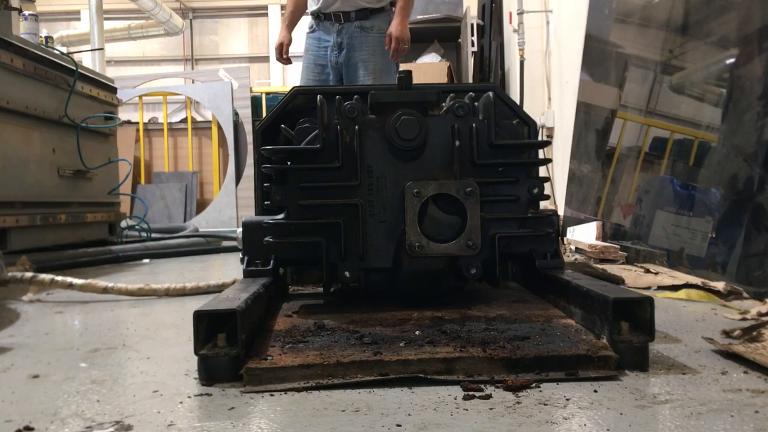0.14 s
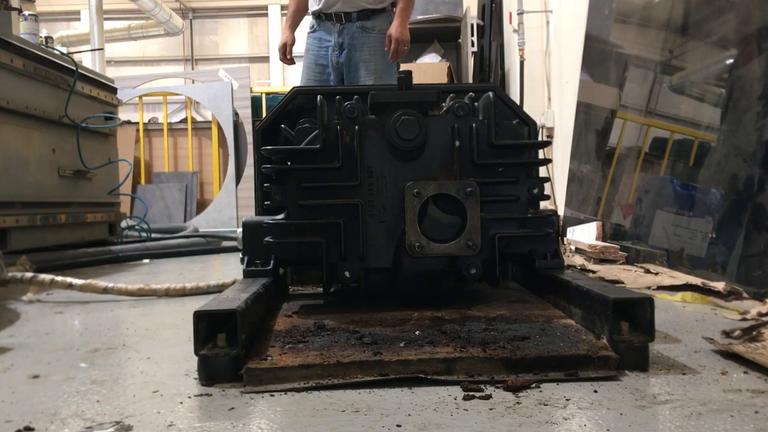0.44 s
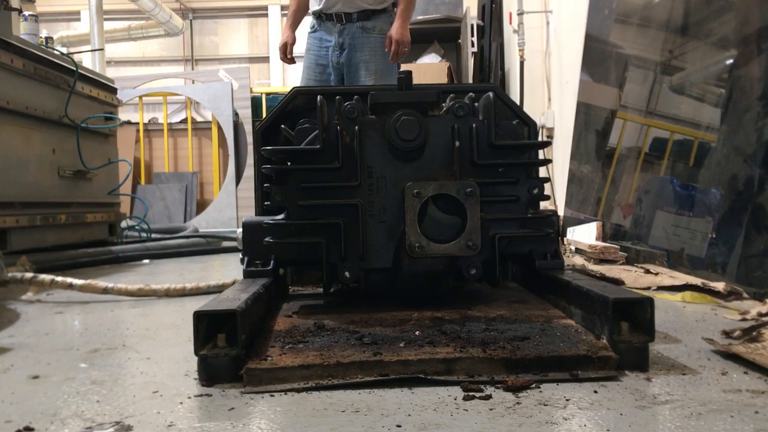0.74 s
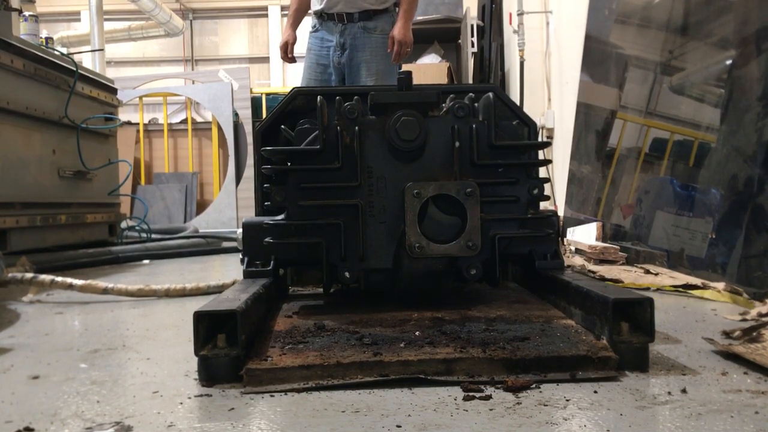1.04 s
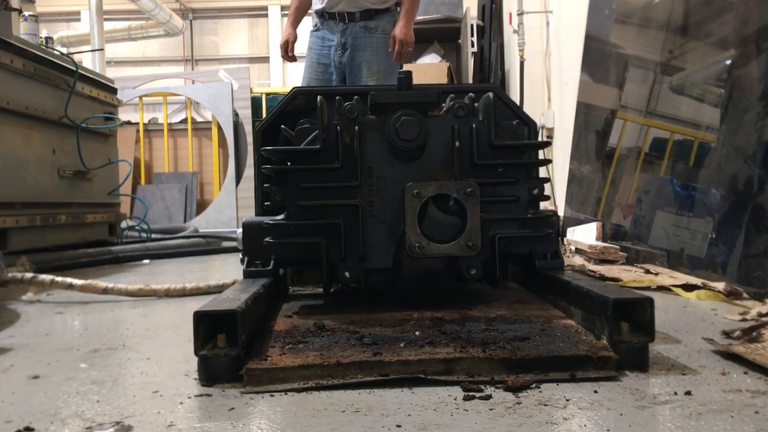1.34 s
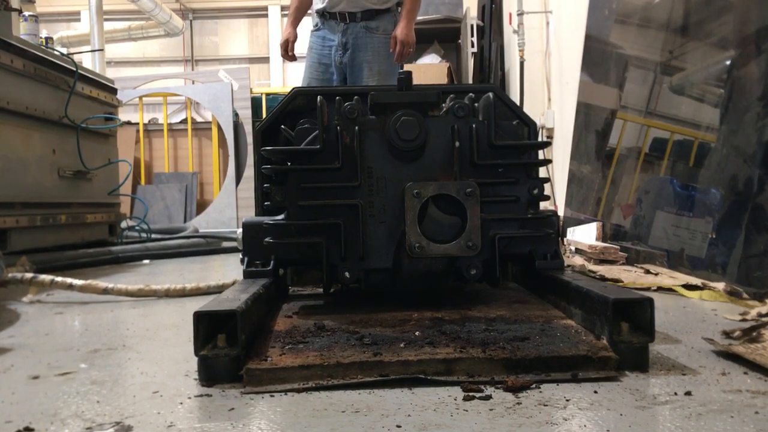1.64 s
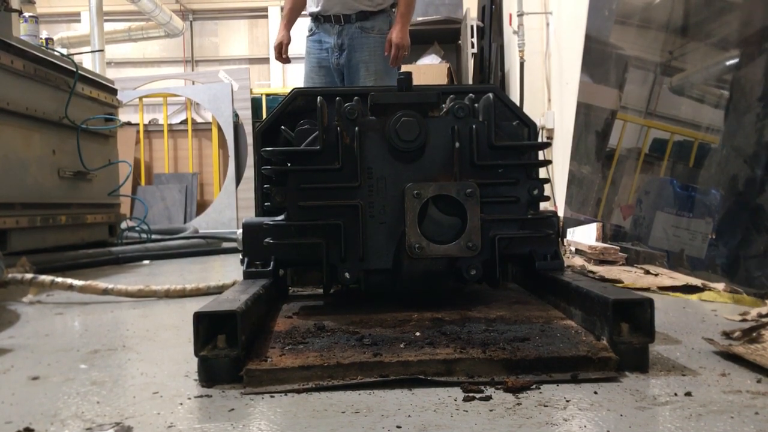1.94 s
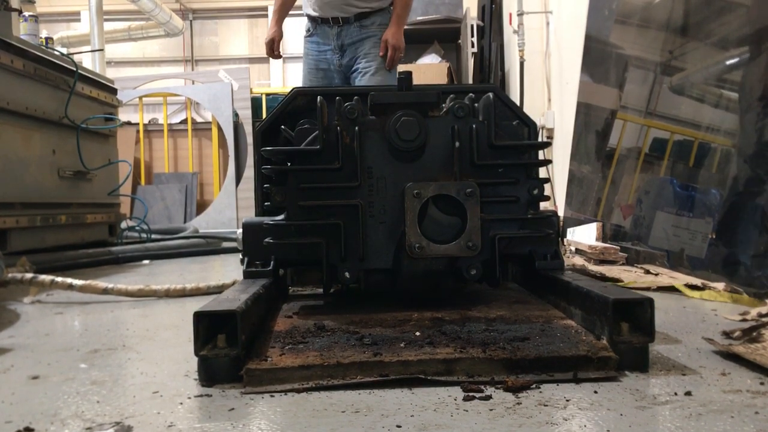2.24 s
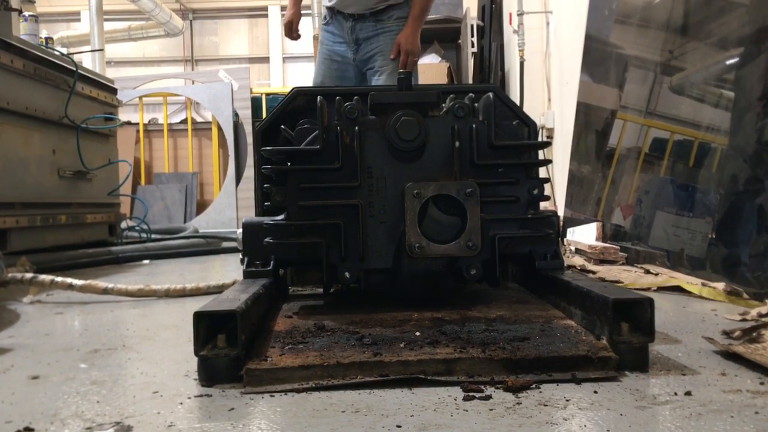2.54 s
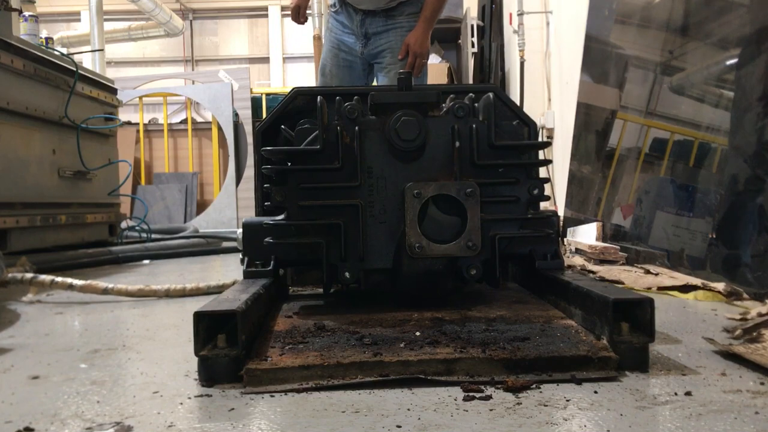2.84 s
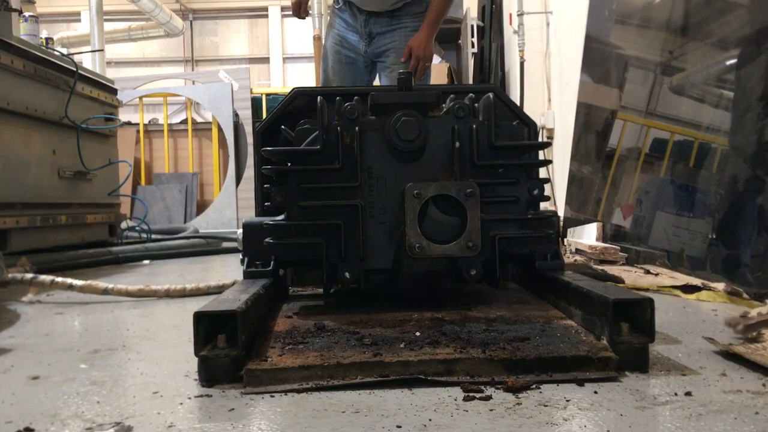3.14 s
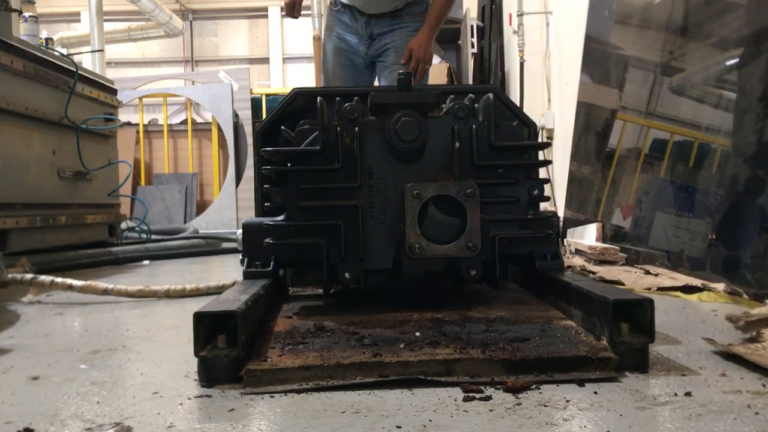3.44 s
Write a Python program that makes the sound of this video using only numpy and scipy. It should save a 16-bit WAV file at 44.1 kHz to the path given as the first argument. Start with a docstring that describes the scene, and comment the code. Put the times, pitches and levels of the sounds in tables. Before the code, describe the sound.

A large vacuum pump runs without pause on a workshop floor, heard loud and close: a deep, rough, level-pitched drone with a buzzing edge, rapid valve chatter and a thin layer of hissing air.

```python
"""A large vacuum pump runs steadily on a workshop floor, close to the microphone.
From the start about 99 exhaust pulses a second drone as stacked cosines, with buzz and shaft tones as sines;
even machine noise and churning air are shaped noise. The tail of a soft rush of air opens the scene;
each cycle then spits air sharply, ticks with ringing noise as the valve shuts, and rushes again.
At the end of the chain the recorder rounds the peaks and cuts the top."""
import sys
import numpy as np
from scipy import signal
from scipy.fft import rfft, irfft
from scipy.io import wavfile
from scipy.ndimage import uniform_filter1d

SR = 44100
rng = np.random.default_rng(int(sys.argv[2]) if len(sys.argv) > 2 else 0)


def put_to_file(sound):
    """Save the sound as 16-bit audio at rate SR, in the file named by the first command-line argument."""
    columns = np.atleast_2d(sound).T  # one column per channel
    safe = np.clip(columns, -1, 1)
    whole_steps = np.round(safe * 32767)
    wavfile.write(sys.argv[1], SR, whole_steps.astype(np.int16))


N = 158760  # samples, 3.6 s

# Harmonics of the exhaust pulses, relative: [multiple of the pulse rate, level/dB]
DRONE_HARMONICS = [(1, -10), (2, -22), (3, 0), (4, 0), (5, -15), (6, -26), (7, -15), (8, -22), (9, -8),
                   (10, -17), (11, -16), (12, -19), (13, -15), (14, -23), (15, -17), (16, -20), (17, -21),
                   (18, -12), (19, -16), (20, -30), (21, -20), (22, -26), (23, -41), (24, -35), (25, -25),
                   (26, -29), (27, -28), (28, -27), (29, -24), (30, -23), (31, -30), (32, -25), (33, -33),
                   (34, -30), (35, -25), (36, -22), (37, -26), (38, -26), (39, -33), (40, -26), (41, -30),
                   (42, -39), (43, -36), (44, -28)]
# Slow drift of the two loudest harmonics, used about its mean: [t/s, third level/dB, fourth level/dB]
LOUD_PAIR_DRIFT = [(0.1, -9.5, -8), (0.22, -10, -8), (1.85, -9, -8.5), (2.6, -8.5, -10.5), (3.5, -10.5, -9)]
# Thin buzz above the drone: [f/Hz, rms level of each harmonic there/dB]
BUZZ_SPECTRUM = [(4450, -44.5), (4900, -48.5), (5600, -47), (7000, -54.5), (8200, -54.5), (9400, -62),
                 (10100, -64)]
# Faint tones of the shaft, which turns once in two pulses: [multiple of the shaft rate, rms level/dB]
SHAFT_TONES = [(11, -52), (13, -46.5), (19, -45.5), (25, -51), (39, -55), (108, -39.5)]
# Even noise of the machine in the workshop, relative: [f/Hz, level/dB per Hz]
MACHINE_SPECTRUM = [(20, -4), (50, 3), (95, 1.5), (170, 0.5), (280, -0.5), (390, 2.5), (560, -1),
                    (880, -3.5), (1300, 0), (1950, -24), (2300, -15), (2750, -8), (3600, -8.5),
                    (5600, -5.5), (8000, -14), (9500, -15.5), (10400, -21), (11600, -17), (15500, -31)]
# Air churning in the pump chamber, relative: [f/Hz, level/dB per Hz]
CHURN_SPECTRUM = [(200, -20), (450, -1.5), (680, -2.5), (880, 2), (1080, -7), (1280, -0.5), (1690, -3),
                  (1830, 2), (2120, -1.5), (2260, -2.5), (3500, -23.5), (5000, -27)]
# Air escaping at the exhaust valve, relative: [f/Hz, level/dB per Hz]
AIR_SPECTRUM = [(1500, -27), (2800, -18), (3700, 3.5), (4700, -6.5), (5500, -1.5), (6200, -9.5),
                (6900, -2.5), (7700, -6.5), (9500, -3), (10400, -11), (11500, -7), (13500, -15),
                (15800, -18)]
# Ring of the valve when it ticks shut: [f/Hz, width/Hz, rms level/dB]
TICK_RINGS = [(5640, 550, -34), (6740, 520, -37), (9300, 1000, -41.5), (11800, 1500, -46)]

# _DB sets an rms level, _UNEVEN_DB a random spread; _AT is a place in the pulse cycle, 0-1
PULSE_HZ, FIRST_PULSE_S = 99.11, .0008
SPEED_WANDER, SPEED_WANDERS_PER_S = 0.000197, 2.924  # spread as a share of the speed
DRONE_DB = -7
LAG_S, SMEAR_S = .0049, .0103  # lag common to all harmonics, and the extra lag at 1 kHz
SCATTER_HZ = 1549.5  # reflections have scattered the harmonics by one radian here
WAVER_DB, WAVER_PER_S, WAVER_FULL_HZ = 0.66, 5.12, 1300  # the spread is reached from WAVER_FULL_HZ up
BUZZ_TOP_HZ = 10100
MACHINE_DB = -29.5
CHURN_DB, CHURN_DEPTH, CHURN_AT = -29.5, 0.2, 0.24  # depth 0-1
RUSH_DB, RUSH_AT, RUSH_WIDTH_S, RUSH_UNEVEN_DB = -39, 0.87, 0.0011, 2
SPIT_DB, SPIT_AT, SPIT_RISE_S, SPIT_FALL_S, SPIT_UNEVEN_DB = -33, 0.2, .0005, .0016, 2.5
TICK_AT, TICK_RISE_S, TICK_FALL_S = 0.21, .0003, 0.00077
TICK_UNEVEN_DB, TICK_JITTER_S = 2, 0.00016
TICK_SWELL_DB, TICK_SWELLS_PER_S = 3, 10
CEILING, KNEE, TOP_HZ = 1.0, 20, 15750  # full scale = 1; a higher knee bends more abruptly


def undb(db):
    """Decibels to gain."""
    return 10 ** (np.asarray(db) / 20)


def level(x, db):
    """Set the rms level."""
    return x * undb(db) / np.sqrt(np.mean(x ** 2))


def colour(points, hz):
    """Gain of a (Hz, dB) spectrum, joined by straight lines over log frequency."""
    f, db = np.array(points, float).T
    return undb(np.interp(np.log(np.maximum(hz, 1)), np.log(f), db))


def noise(points):
    """White noise shaped to the given spectrum, at rms 1."""
    white = rfft(rng.standard_normal(N))
    hz = np.arange(N // 2 + 1) * SR / N
    return level(irfft(white * colour(points, hz), N), 0)


def walk(rate):
    """Slow chance: random levels held 1 / rate s and slewed twice, rms 1."""
    hold = int(SR / rate)
    held = np.repeat(rng.standard_normal(256), hold)[:N]
    slewed = uniform_filter1d(held, hold)
    return level(uniform_filter1d(slewed, hold), 0)


def in_cycle(cycles, at):
    """Seconds from the nearest passing of a place in the cycle, and a random value for each passing."""
    nearest = np.round(cycles - at)
    since = (cycles - at - nearest) / PULSE_HZ
    chance = rng.standard_normal(512)[nearest.astype(int) + 2]
    return since, chance


def puff(since, rise_s, fall_s):
    """A quick Gaussian swell and an exponential fall."""
    rise = np.exp(-(since / rise_s) ** 2 / 2)
    fall = np.exp(-np.abs(since) / fall_s)
    return np.where(since < 0, rise, fall)


def tone(cycles, db):
    """A steady sine locked to the rotation, at an rms level and a random phase."""
    return np.sqrt(2) * undb(db) * np.sin(2 * np.pi * (cycles + rng.random()))


def drone(t, cycles):
    """Exhaust pulses, smeared by the casing into a steady stack of harmonics that waver a little."""
    drift = np.array(LOUD_PAIR_DRIFT)
    about_mean = drift[:, 1:] - drift[:, 1:].mean(axis=0)
    drift_db = {3: about_mean[:, 0], 4: about_mean[:, 1]}
    out = 0
    for k, (_, db) in enumerate(DRONE_HARMONICS, 1):
        hz = k * PULSE_HZ
        lag = LAG_S + SMEAR_S * np.sqrt(hz / 1000)  # higher harmonics leave the casing later
        scatter = (hz / SCATTER_HZ) ** 4 * rng.standard_normal()
        db = db + WAVER_DB * min(hz / WAVER_FULL_HZ, 1) * walk(WAVER_PER_S)
        if k in drift_db:
            db = db + np.interp(t, drift[:, 0], drift_db[k])
        phase = 2 * np.pi * (k * cycles - hz * lag) + scatter
        out = out + undb(db) * np.cos(phase)
    return level(out, DRONE_DB)


def buzz(cycles):
    """The top harmonics of the pulses, steady sines above the drone's stack."""
    orders = range(len(DRONE_HARMONICS) + 1, int(BUZZ_TOP_HZ / PULSE_HZ))
    return sum(colour(BUZZ_SPECTRUM, k * PULSE_HZ) * tone(k * cycles, 0) for k in orders)


def shaft(cycles):
    """Faint tones of the shaft, at multiples of half the pulse rate."""
    return sum(tone(k * cycles / 2, db) for k, db in SHAFT_TONES)


def machine():
    """Even noise of the running machine, independent of the cycle."""
    return undb(MACHINE_DB) * noise(MACHINE_SPECTRUM)


def chamber(cycles):
    """Churning air that swells once a cycle."""
    swell = 1 + CHURN_DEPTH * np.cos(2 * np.pi * (cycles - CHURN_AT))
    return level(noise(CHURN_SPECTRUM) * swell, CHURN_DB)


def rush(cycles):
    """Air rushes softly from the valve late in the cycle, in a Gaussian puff of uneven strength."""
    since, chance = in_cycle(cycles, RUSH_AT)
    shape = np.exp(-(since / RUSH_WIDTH_S) ** 2 / 2) * undb(RUSH_UNEVEN_DB * chance)
    return level(shape * noise(AIR_SPECTRUM), RUSH_DB)


def spit(cycles):
    """Air spits sharply from the valve once a cycle; no two puffs are equally strong."""
    since, chance = in_cycle(cycles, SPIT_AT)
    shape = puff(since, SPIT_RISE_S, SPIT_FALL_S) * undb(SPIT_UNEVEN_DB * chance)
    return level(shape * noise(AIR_SPECTRUM), SPIT_DB)


def ticks(cycles):
    """The valve chatters: every tick lands a little early or late and stirs each resonance differently."""
    since, late = in_cycle(cycles, TICK_AT)
    shape = puff(since - TICK_JITTER_S * late, TICK_RISE_S, TICK_FALL_S)
    out = 0
    for hz, width, db in TICK_RINGS:
        b, a = signal.iirpeak(hz, hz / width, fs=SR)
        ring = signal.lfilter(b, a, rng.standard_normal(N))
        _, chance = in_cycle(cycles, TICK_AT)
        strength_db = TICK_UNEVEN_DB * chance + TICK_SWELL_DB * walk(TICK_SWELLS_PER_S)
        out = out + level(ring * shape * undb(strength_db), db)
    return out


def scene():
    """The pump's pulsed and tonal sounds follow one nearly constant rotation, over the machine noise."""
    t = np.arange(N) / SR
    speed = 1 + SPEED_WANDER * walk(SPEED_WANDERS_PER_S)
    cycles = PULSE_HZ * (np.cumsum(speed) / SR - FIRST_PULSE_S)
    steady = drone(t, cycles) + buzz(cycles) + shaft(cycles) + machine()
    air = chamber(cycles) + rush(cycles) + spit(cycles)
    return (steady + air + ticks(cycles))[None]


def record(dry):
    """The recorder rounds the peaks near full scale and cuts the top with a steep low-pass."""
    rounded = dry / (1 + np.abs(dry / CEILING) ** KNEE) ** (1 / KNEE)
    # order 10, ripple 0.1 dB, stop band 80 dB down
    low_pass = signal.ellip(10, .1, 80, TOP_HZ, fs=SR, output="sos")
    return signal.sosfilt(low_pass, rounded)


dry = scene()
out = record(dry)
put_to_file(out)
```